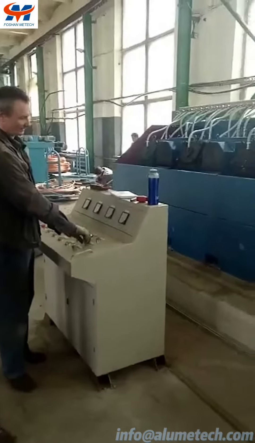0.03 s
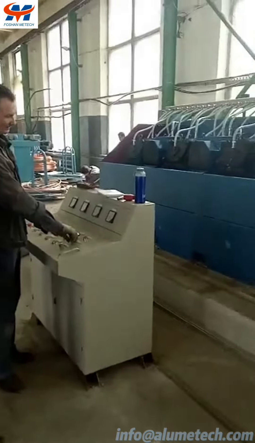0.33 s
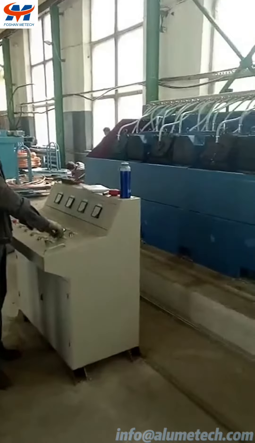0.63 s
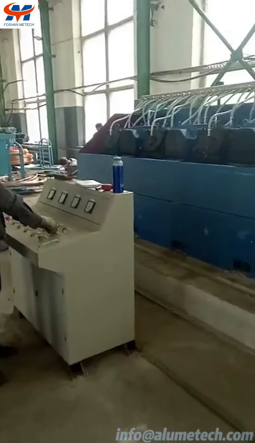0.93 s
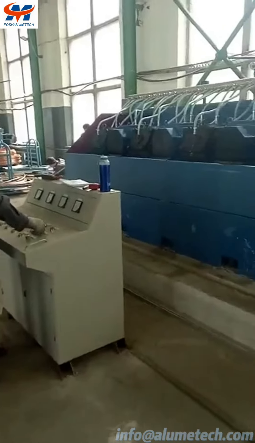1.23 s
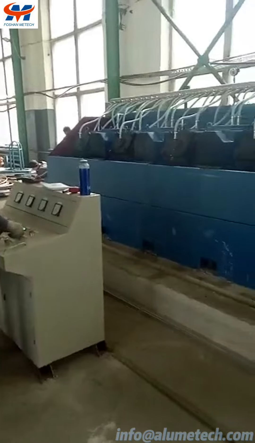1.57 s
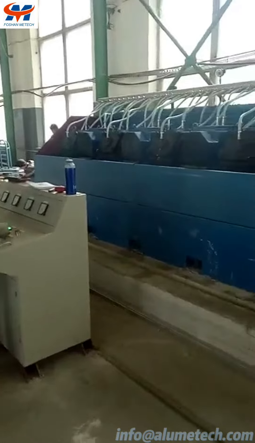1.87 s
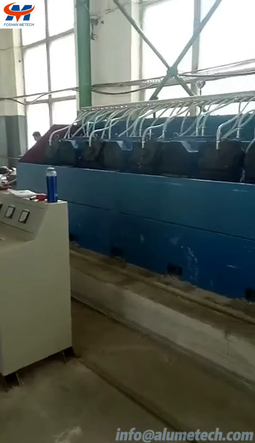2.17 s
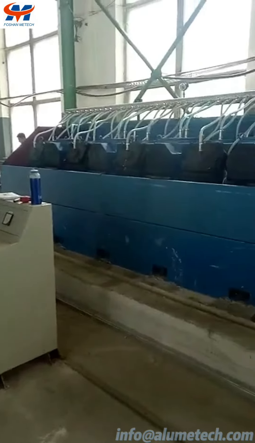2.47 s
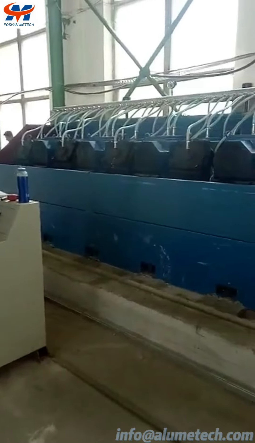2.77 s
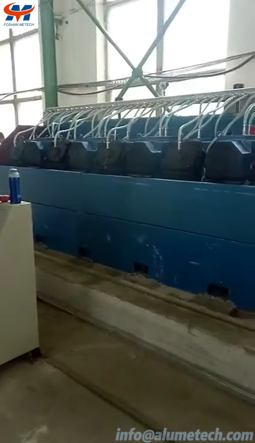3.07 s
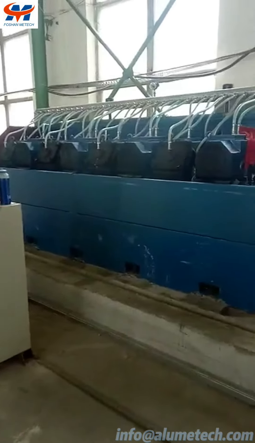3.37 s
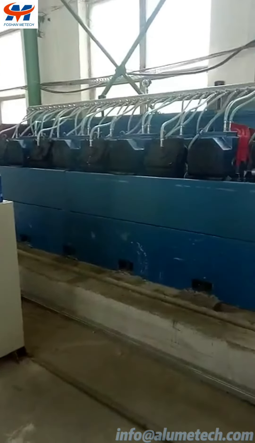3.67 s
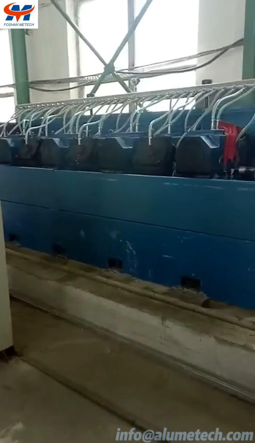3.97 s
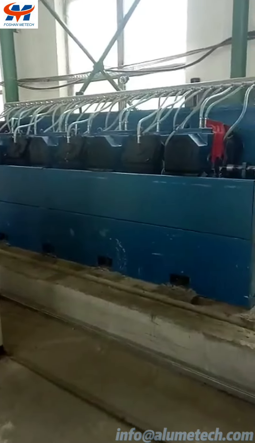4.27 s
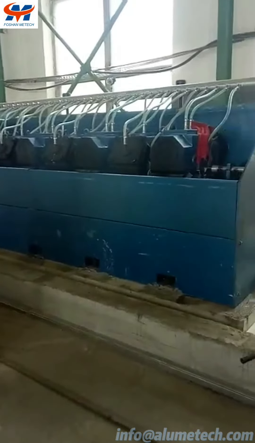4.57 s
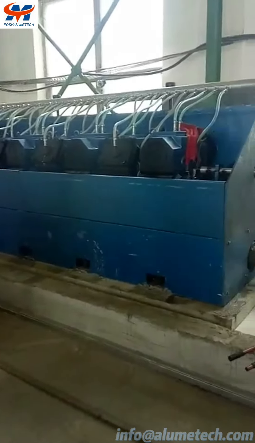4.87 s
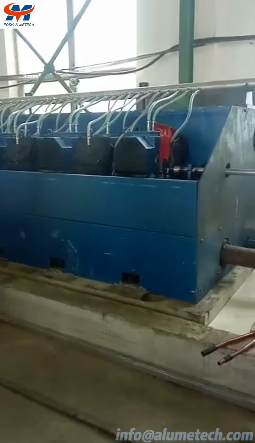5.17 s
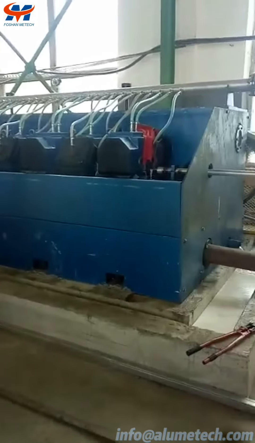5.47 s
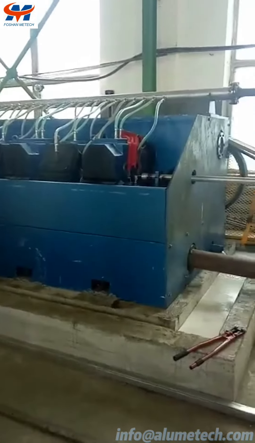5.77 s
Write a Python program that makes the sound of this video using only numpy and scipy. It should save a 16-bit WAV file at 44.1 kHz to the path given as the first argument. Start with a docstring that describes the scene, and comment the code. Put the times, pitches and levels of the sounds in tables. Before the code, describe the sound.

Loud machinery drones and whines in a large hall; a rumbling clatter swells early, then metal rod scrapes, clinks and squeaks.

```python
"""The roar and drone of a cold rolling mill's gear stands fill a large factory hall.
Early on, one heavy rumbling clatter swells and dies. Two inverter drives whine, rising and
fading as the listener walks slowly through the hall's standing waves. The metal rod rubs,
sings, squeaks and clinks in its guides. Gain control ducks the loudest moments."""
import sys
import numpy as np
from scipy import signal
from scipy.io import wavfile
from scipy.ndimage import uniform_filter1d, minimum_filter1d

SR = 44100
rng = np.random.default_rng(int(sys.argv[2]) if len(sys.argv) > 2 else 0)


def to_wav(sig):
    """Store sig (one row per channel, or 1-D mono) as 16-bit WAV at the path in sys.argv[1].

    Samples outside -1..1 are clipped; the rate is SR.
    """
    pcm = np.clip(np.atleast_2d(sig), -1, 1) * 32767
    pcm = np.round(pcm).astype(np.int16)
    wavfile.write(sys.argv[1], SR, pcm.T)  # frames by channels


N = 264600


# (frequency [Hz], relative density [dB])
ROAR_SPECTRUM = [(25, -15.5), (50, -30), (70, -16), (105, -7), (250, -0.5), (450, -5.5), (1000, -6.5),
                 (1550, -11.5), (2250, -10.5), (3300, -19), (3800, -15.5), (4500, -16.5), (5400, -25.5),
                 (6200, -34), (8500, -54.5), (15000, -56)]
ROAR_DB, LOAD_SWING_DB, HISS_DB, HISS_SWING_DB = -18.5, 0.88, -3, 0.82

def stands():
    """Many meshing gears blur into a roar that shudders with the load; the rolls hiss on the rod."""
    load_db = LOAD_SWING_DB * drift(22)
    hiss_db = HISS_DB + HISS_SWING_DB * drift(2.1)
    shake_db = lambda hz: load_db + (hiss_db if hz > 3300 else 0)
    return from_db(ROAR_DB) * banded_noise(ROAR_SPECTRUM, flicker_db=1.19, shake_db=shake_db)


def clatter_swell(t, fall_db_per_s):
    """Gain of the clatter: fast rise, brief hold, slow fall."""
    peak_s, peak_db, hold_s, rise_db_per_s = 0.632, -12, 0.08, 87
    early_s = np.maximum(peak_s - t, 0)
    late_s = np.maximum(t - peak_s - hold_s, 0)
    return from_db(peak_db - rise_db_per_s * early_s - fall_db_per_s * late_s)


# (frequency [Hz], relative density [dB])
CLATTER_SPECTRUM = [(30, -11), (55, -34), (90, 3), (250, 2.5), (600, -1), (1100, -3), (2200, -9.5),
                    (4000, -20.5), (6000, -34), (8500, -75), (15000, -66)]
# knocks in the clatter: (time [s], relative level [dB])
CLATTER_KNOCKS = [(.5887, -7), (0.624, -13), (0.651, -10), (.671, -11), (.698, -18)]

def clatter():
    """A heavy rattling swell with dull knocks around its peak; its bass builds later and lingers."""
    t, bass_lag_s = np.arange(N) / SR, 0.012
    rattle_db = drift(35)
    noise = banded_noise(CLATTER_SPECTRUM, flicker_db=0.5, shake_db=lambda hz: rattle_db)
    bass = clatter_swell(t - bass_lag_s, fall_db_per_s=13) * butter(noise, 3, 420, "low")
    upper = clatter_swell(t, fall_db_per_s=15.5) * butter(noise, 3, 420, "high")
    knocks = hall(clicks(CLATTER_KNOCKS), t60_s=0.038, wet_db=21.5)
    knocks = butter(knocks, 4, [300, 3900], "band")
    times_s, levels_db = np.transpose(CLATTER_KNOCKS)
    return bass + upper + knocks * pan(7.2) + ticks(times_s, levels_db - 24)


# gear tones and inverter sidebands: (frequency [Hz], relative level [dB])
DRIVE_TONES = [(1173, -47.5), (1793.5, -39), (1931.3, -32), (2023, -46.5), (2115, -37), (2207, -41),
               (2802, -41), (2942, -37), (4000, -42.5), (4046, -45), (8043, -74.5)]
# lines along the walk: (time [s], relative level [dB])
LOW_WHINE_LEVELS = [(0, -33), (.6, -38), (1.15, -43), (1.6, -54), (1.87, -34), (2.35, -34), (2.9, -36),
                    (3.8, -32.5), (4.25, -37.5), (4.85, -44), (5.3, -38.5), (6, -34.5)]
LOW_SIDEBAND_LEVELS = [(0, -50), (1.55, -55), (1.85, -40), (2.3, -35), (3.55, -44), (4.15, -59), (4.4, -49),
                       (5.1, -37), (6, -48)]
HIGH_SIDEBAND_LEVELS = [(0, -54), (.8, -40), (1.5, -42), (1.8, -59), (2.25, -41), (2.7, -42), (3.25, -50),
                        (3.8, -45), (4.3, -37), (4.7, -41), (5.5, -40), (5.8, -53)]
GEAR_WHINE_LEVELS = [(0, -31.5), (.4, -30.5), (1.25, -33.5), (1.7, -34), (2.1, -38), (2.35, -33),
                     (2.85, -31), (3.1, -47), (3.85, -30), (4.5, -39), (5, -36.5), (5.35, -34), (6, -47)]
MOTOR_HUM_LEVELS = [(0, -38), (.9, -40), (1.1, -27), (1.3, -39), (2.2, -49), (6, -48)]
# high drive along the walk: (time [s], left level [dB], right level [dB])
HIGH_WHINE_LEVELS = [(0, -28.5, -32), (.5, -30, -33.5), (.85, -27.5, -34), (1.13, -37, -42),
                     (1.42, -24.5, -39), (1.67, -25, -48), (1.85, -31, -40), (2.15, -47, -36),
                     (2.7, -50, -45), (3, -39, -50), (3.9, -44, -49), (4.3, -34, -50), (4.5, -37, -40),
                     (4.85, -29, -40), (5.3, -34.5, -43), (5.48, -30, -49), (5.75, -46, -49), (6, -46, -52)]
LOW_UPPER_SIDEBAND_HZ, LOW_LOWER_SIDEBAND_HZ, HIGH_HZ, HIGH_SIDEBAND_HZ = 2069, 1977.2, 3000.3, 3058.6
GEAR_HZ, MOTOR_HUM_HZ = 1072, 658

def drives():
    """Motor windings sing at two switching rates and beat with sidebands, beside gear whine and hum."""
    tones = sum(from_db(level_db - 6) * tone(hz, fade_db=4, scatter_rad=0.88, lag_rad=1.2)
                for hz, level_db in DRIVE_TONES)
    low = whine(LOW_UPPER_SIDEBAND_HZ, LOW_WHINE_LEVELS)
    sidebands = whine(LOW_LOWER_SIDEBAND_HZ, LOW_SIDEBAND_LEVELS)
    sidebands += whine(HIGH_SIDEBAND_HZ, HIGH_SIDEBAND_LEVELS)
    gear = from_db(-4) * whine(GEAR_HZ, GEAR_WHINE_LEVELS)
    low_rasp = from_db(in_time(LOW_WHINE_LEVELS)[0] - 7.5) * resonant_noise(hz=2060, width_hz=340)
    hum = whine(MOTOR_HUM_HZ, MOTOR_HUM_LEVELS) * pan(5.6)
    high = whine(HIGH_HZ, HIGH_WHINE_LEVELS)
    return (tones + low + sidebands + gear + low_rasp) * pan(9) + high + hum


def whine(hz, level_curve):
    """A line swells and fades as the listener walks through its standing waves."""
    return from_db(in_time(level_curve)) * tone(hz, fade_db=0, scatter_rad=0.42, lag_rad=1)


def tone(hz, fade_db, scatter_rad, lag_rad):
    """A sine, out of step left and right; moving reflections shift its level and phase; rms 1."""
    phase = 2 * np.pi * hz * np.arange(N) / SR
    sides = [from_db(fade_db * drift(0.71)) * np.sin(phase + lag + scatter_rad * drift(0.8))
             for lag in (0, lag_rad)]
    return np.array([rms_one(side) for side in sides])


# rubbed resonances: (frequency [Hz], width [Hz], gain [dB])
ROD_RESONANCES = [(4490, 97, -8), (5020, 120, -11), (5270, 220, -8), (6210, 390, -9), (6950, 130, -17),
                  (7850, 230, -26), (10360, 1900, -25.5), (13860, 400, -26.5), (14750, 700, -31.5)]
# struck modes: (frequency [Hz], gain [dB], t60 [s])
ROD_STRUCK_MODES = [(5120, -8, 0.18), (5250, -10, .1), (4680, -16, .05), (6240, -20, .13),
                    (14080, -29, .12), (14600, -26, .14)]
RUBBING_DB, STRIKE_GAIN_DB = -50.5, -1.5

def rod():
    """The rod rubs, chatters and rings in its guides; hard contacts reach its top resonances."""
    times_s, levels_db, t60s_s, hardness_db = contacts().T
    rubbing_power = from_db(RUBBING_DB) ** 2
    power = rubbing_power + contact_power(times_s, levels_db, t60s_s)
    top_power = rubbing_power + contact_power(times_s, levels_db + hardness_db, t60s_s)
    chatter = from_db(3.2 * drift(70))
    scraping = 0
    for hz, width_hz, gain_db in ROD_RESONANCES:
        friction = chatter * np.sqrt(top_power if hz > 9000 else power)
        resonance = from_db(gain_db) * resonant_noise(hz, width_hz)
        scraping += friction * resonance * pan(at_hz(HALL_BALANCE, hz))
    squealing = (singing() + squeaks()) * pan(3.3)
    strikes = clicks(np.c_[times_s, levels_db + STRIKE_GAIN_DB])
    ringing = sum(from_db(gain_db) * ring(strikes, hz, t60_s) for hz, gain_db, t60_s in ROD_STRUCK_MODES)
    direct = scraping + squealing + ringing * pan(6.7)
    return hall(direct, t60_s=0.24, wet_db=-0.5) + ticks(times_s, levels_db + hardness_db)


# rod on guide: (time [s], level [dB], t60 [s], hardness as treble gain [dB])
GUIDE_HITS = [(.388, -46, .08, 7), (1.115, -37, .2, 0), (1.24, -36, 0.42, -1), (1.35, -36.5, .25, 6),
              (1.565, -36, 0.14, -5), (1.86, -37, 0.18, -2), (1.996, -41, 0.11, 3), (2.234, -34.5, .12, 4),
              (2.6, -44, .4, -3), (2.73, -38, .2, 0), (2.925, -37, .2, -3), (3.045, -39, .14, -6),
              (3.578, -30, 0.11, 6.5), (3.7, -36, .11, -1), (3.926, -41, .11, 8), (4.17, -37, 0.28, 1),
              (4.645, -39, .17, 0), (5.022, -38, .22, 0), (5.427, -37, .14, 0), (5.516, -34, 0.15, -1),
              (5.645, -41, .17, 2)]
SCUFFS_PER_S, SCUFF_DB, SCUFF_SPREAD_DB, SCUFF_T60_S = 4, -47, 2, .2
BOUNCE_S, BOUNCE_LOSS_DB, BOUNCE_SOFTENING_DB = .036, 7.5, 14

def contacts():
    """Hits and random light scuffs, each with one weaker, duller rebound; rows as in GUIDE_HITS."""
    times_s = np.cumsum(rng.exponential(1 / SCUFFS_PER_S, size=60))
    levels_db = SCUFF_DB + SCUFF_SPREAD_DB * rng.standard_normal(len(times_s))
    scuffs = [(time_s, level_db, SCUFF_T60_S, 0) for time_s, level_db in zip(times_s, levels_db)]
    hits = np.vstack([GUIDE_HITS, scuffs])
    rebounds = hits + [BOUNCE_S, -BOUNCE_LOSS_DB, 0, -BOUNCE_SOFTENING_DB]
    rows = np.vstack([hits, rebounds])
    return rows[rows[:, 0] < N / SR]


def contact_power(times_s, levels_db, t60s_s, attack_s=0.0034):
    """In each contact the friction sets in quickly and fades."""
    t, power = np.arange(SR) / SR, np.zeros(N + SR)
    onset = np.minimum(t / attack_s, 1)
    for start, level_db, t60_s in zip((times_s * SR).astype(int), levels_db, t60s_s):
        power[start:start + SR] += (onset * from_db(level_db - 60 * t / t60_s)) ** 2
    return power[:N]


def ticks(times_s, levels_db, gain_db=-18.5, t60_s=0.014):
    """A very short burst of treble as metal meets metal."""
    pole = from_db(-60 / (t60_s * SR))
    envelope = signal.lfilter([1], [1, -pole], clicks(np.c_[times_s, levels_db]) + 1e-18)
    return from_db(gain_db) * envelope * resonant_noise(hz=12000, width_hz=4300)


# (time [s], level [dB], length [s], pitch [Hz], glide [Hz])
ROD_SQUEAKS = [(1.15, -43, 0.082, 4550, 2), (1.3, -51, .07, 5030, 40), (1.41, -46, .025, 5000, 0),
               (1.455, -45, .02, 5180, 60), (2.173, -45, 0.097, 4580, -30), (2.7, -42, 0.067, 4540, -2),
               (3.578, -27.5, 0.015, 5010, 0), (3.594, -40, .016, 5150, 250), (3.616, -29, 0.014, 5005, 0),
               (3.7, -39, .014, 5050, 0), (4.83, -44, 0.066, 4500, 50), (5.518, -40, .03, 5020, 0),
               (5.875, -41, 0.044, 4560, 2)]

def squeaks():
    """The rod sticks and slips: short, unsteady tones that may glide."""
    t, out = np.arange(N) / SR, 0
    jitter_hz = 21.8 * drift(62.3)
    for start_s, level_db, length_s, hz, glide_hz in ROD_SQUEAKS:
        pitch_hz = hz + jitter_hz + glide_hz * np.clip((t - start_s) / length_s, 0, 1)
        gain = from_db(level_db) * held(start_s, length_s, attack_s=0.0033, release_s=0.0065)
        out += gain * sine(pitch_hz)
    return out


# (time [s], length [s], level [dB])
ROD_DRAGS = [(.01, .62, -52), (1.108, .34, -44.5), (1.84, .3, -51), (2.497, 0.23, -49), (2.878, 0.22, -51),
             (3.62, .25, -54), (4.08, 0.25, -49.5), (4.547, .1, -47), (4.93, 0.16, -55), (5.48, .18, -50)]
SING_HZ, SING_JITTER_HZ, SING_CHATTER_DB = 5080, 36, 3.5

def singing():
    """While it drags through a guide the rod keeps up a thin, chattering ring."""
    pressure = sum(from_db(level_db) * held(start_s, length_s, attack_s=0.028, release_s=0.055)
                   for start_s, length_s, level_db in ROD_DRAGS)
    pitch_hz = SING_HZ + SING_JITTER_HZ * drift(44.8)
    return pressure * from_db(SING_CHATTER_DB * drift(40)) * sine(pitch_hz)


# (frequency [Hz], width [Hz], relative level [dB])
HOUSING_RESONANCES = [(79, 12, -45), (92, 7.6, -34.5), (113.3, 15.6, -30.5), (146.9, 7.8, -28.5),
                      (165.1, 7.4, -29.5), (230, 13.2, -29), (273.6, 12, -37.5), (339.6, 7, -29),
                      (413, 4.6, -55.5), (595.6, 2.7, -38.5), (667, 24, -43.5), (716, 3.1, -43)]

def housings():
    """Gear forces keep the narrow resonances of the casings droning."""
    return sum(from_db(level_db - 4) * diffuse(resonant_noise(hz, width_hz), hz)
               for hz, width_hz, level_db in HOUSING_RESONANCES)


# (frequency [Hz], left-right correlation before clipping [1])
HALL_LIKENESS = [(60, 5), (130, 1), (290, 0.9), (640, 0.6), (1410, -0.22), (3100, 0.02), (6820, -0.18),
                 (15000, 0.5)]
# (frequency [Hz], left minus right [dB])
HALL_BALANCE = [(60, 4.1), (110, 5.8), (200, 6.4), (380, 6.1), (700, 4.9), (1290, 9.8), (2380, 11.2),
                (4400, 4.9), (8120, 0.5), (15000, 1.5)]

def diffuse(pair, hz):
    """Two unrelated signals become the hall's stereo field."""
    correlation = np.clip(at_hz(HALL_LIKENESS, hz), -.99, .99)
    mid = np.sqrt(1 + correlation) * pair[0]
    side = np.sqrt(1 - correlation) * pair[1]
    return np.array([mid + side, mid - side]) * pan(at_hz(HALL_BALANCE, hz)) / np.sqrt(2)


def hall(x, t60_s, wet_db):
    """Direct sound plus a dense tail of reflections, different on each side."""
    t = np.arange(SR) / SR
    tail = rng.standard_normal((2, SR)) * from_db(-60 * t / t60_s)
    tail /= np.sqrt(np.sum(tail ** 2, axis=1, keepdims=True))
    return x + from_db(wet_db) * signal.fftconvolve(np.atleast_2d(x), tail, axes=1)[:, :N]


def banded_noise(spectrum, flicker_db, shake_db):
    """Bands of stereo noise, each flickering by itself and shaken in common; rms 1."""
    edges_hz = np.r_[np.geomspace(20, 1000, 11)[:-1], np.geomspace(1000, 17000, 17)]
    white, out = rng.standard_normal((2, 2, N)), 0
    for k, (low_hz, high_hz) in enumerate(zip(edges_hz, edges_hz[1:])):
        band = butter(white[k % 2], 3, [low_hz, high_hz], "band")
        hz = np.sqrt(low_hz * high_hz)
        level_db = at_hz(spectrum, hz) + flicker_db * drift(19.5) + shake_db(hz)
        out += diffuse(band, hz) * from_db(level_db)
    return rms_one(out)


def resonant_noise(hz, width_hz):
    """Two unrelated noises through one steep-sided resonance; rms 1."""
    r = np.exp(-np.pi * 1.5 * width_hz / SR)
    section = [1, 0, -1, 1, -2 * r * np.cos(2 * np.pi * hz / SR), r * r]
    white = rng.standard_normal((2, N + SR))
    return rms_one(signal.sosfilt([section, section], white)[:, SR:])


def ring(drive, hz, t60_s):
    """Damped mode: a unit click rings at height 1."""
    r, w = from_db(-60 / (t60_s * SR)), 2 * np.pi * hz / SR
    return signal.lfilter([0, np.sin(w)], [1, -2 * r * np.cos(w), r * r], drive + 1e-18)


def clicks(rows):
    """One click per (time [s], level [dB])."""
    times_s, levels_db = np.transpose(rows)
    out = np.zeros(N)
    out[(times_s * SR).astype(int)] = from_db(levels_db)
    return out


def sine(pitch_hz):
    """Sine following a pitch curve; rms 1."""
    return np.sqrt(2) * np.sin(2 * np.pi * np.cumsum(pitch_hz) / SR)


def held(start_s, length_s, attack_s, release_s):
    """Gain that rises, holds and falls."""
    t = np.arange(N) / SR - start_s
    return np.clip(np.minimum(t / attack_s, 1 + (length_s - t) / release_s), 0, 1)


def drift(rate_hz):
    """Smooth random wander; rms 1."""
    hop, settle = 40, 2000
    r = np.exp(-2 * np.pi * rate_hz * hop / SR)
    white = rng.standard_normal(N // hop + settle + 2)
    slow = signal.lfilter([1], [1, -2 * r, r * r], white)[settle:]
    return np.interp(np.arange(N) / hop, np.arange(len(slow)), rms_one(slow))


def in_time(rows):
    """Each column of a curve at every sample."""
    times_s, *columns = np.transpose(rows)
    return [np.interp(np.arange(N) / SR, times_s, column) for column in columns]


def at_hz(rows, hz):
    """Read a spectrum on a log-frequency axis."""
    points_hz, values = np.transpose(rows)
    return np.interp(np.log(hz), np.log(points_hz), values)


def butter(x, order, hz, kind):
    """Low-, high- or band-pass."""
    return signal.sosfilt(signal.butter(order, hz, kind, fs=SR, output="sos"), x)


def pan(left_db):
    """Channel gains for a left-minus-right level."""
    return from_db(np.array([[.5], [-.5]]) * left_db)


def from_db(db):
    """Decibels to gain."""
    return 10 ** (np.asarray(db) / 20)


def rms_one(x):
    """Scale to unit power."""
    return x / np.sqrt(np.mean(x ** 2) + 1e-20)


def limit(x, ceiling=.9):
    """A fast limiter eases the gain down around each peak."""
    gain = np.minimum(1, ceiling / (np.abs(x).max(axis=0) + 1e-9))
    return x * uniform_filter1d(minimum_filter1d(gain, size=129), size=129)


def scene():
    """Everything sounds together in the hall."""
    return stands() + housings() + drives() + clatter() + rod()


def record(dry):
    """Gain control ducks loud moments, holds and lets go; peaks are limited and the top is cut."""
    threshold_db, slope, hold_s, smoothing_s, cutoff_hz = -14.6, .7, .42, 0.081, 15400
    level_db = 10 * np.log10(uniform_filter1d(np.mean(dry ** 2, axis=0), 2048) + 1e-12)
    duck_db = -slope * np.maximum(level_db - threshold_db, 0)
    half_hold = int(hold_s * SR / 2)
    held_db = minimum_filter1d(duck_db, 2 * half_hold + 1, origin=half_hold)
    pole = np.exp(-1 / (smoothing_s * SR))
    gain_db = signal.lfilter([1 - pole], [1, -pole], held_db)
    lowpass = signal.ellip(10, .1, 90, cutoff_hz, fs=SR, output="sos")
    return signal.sosfilt(lowpass, limit(dry * from_db(gain_db)))


dry = scene()
out = record(dry)
to_wav(out)
```